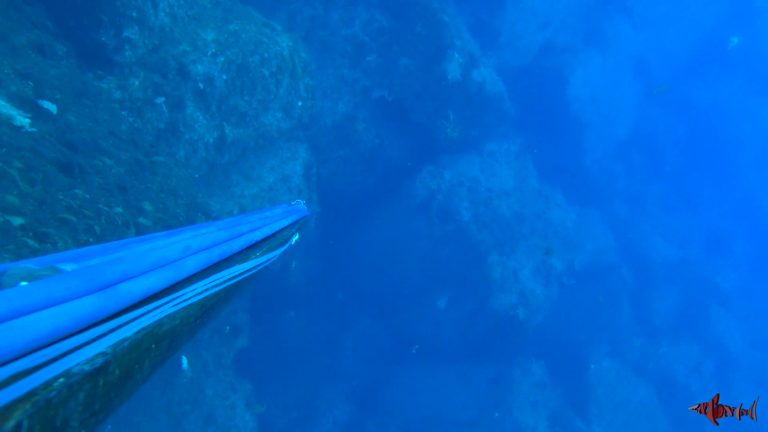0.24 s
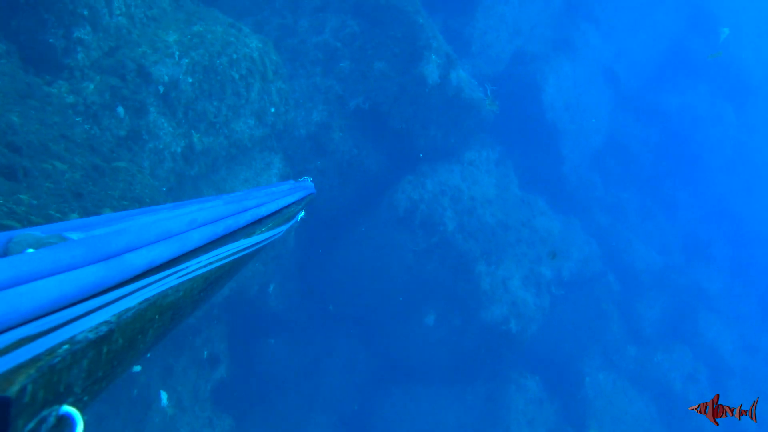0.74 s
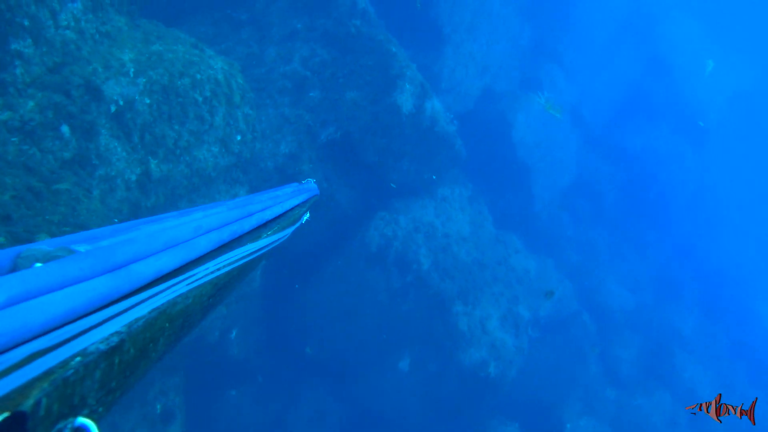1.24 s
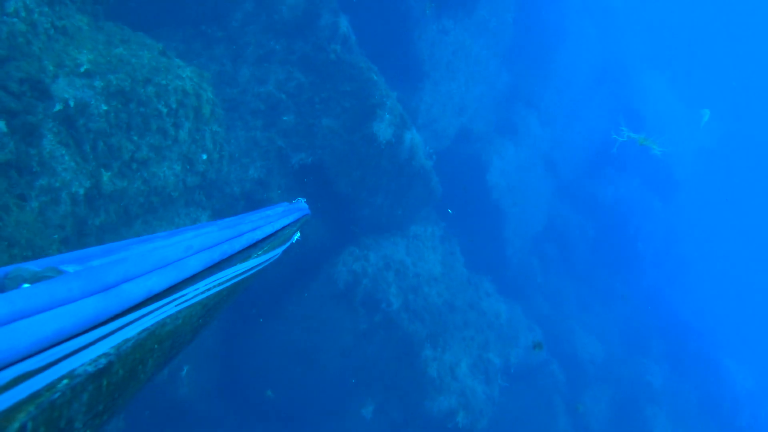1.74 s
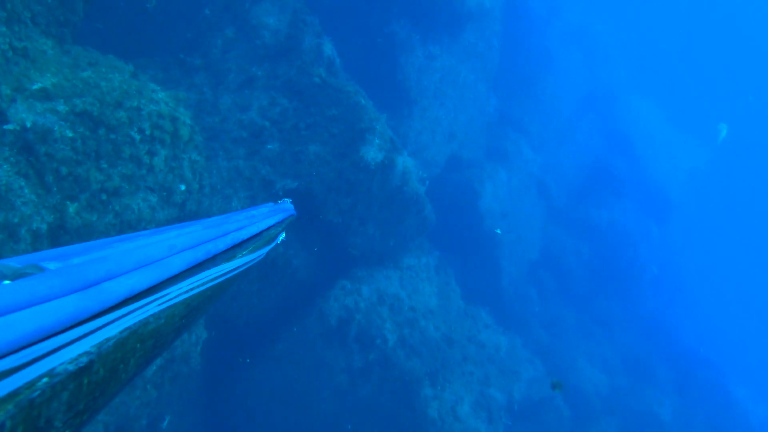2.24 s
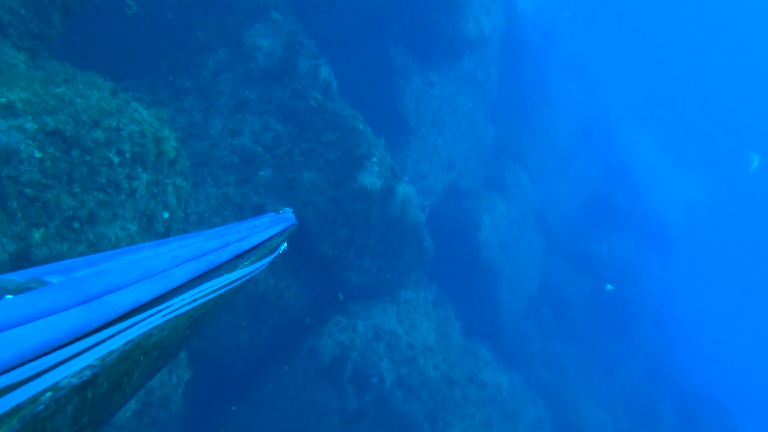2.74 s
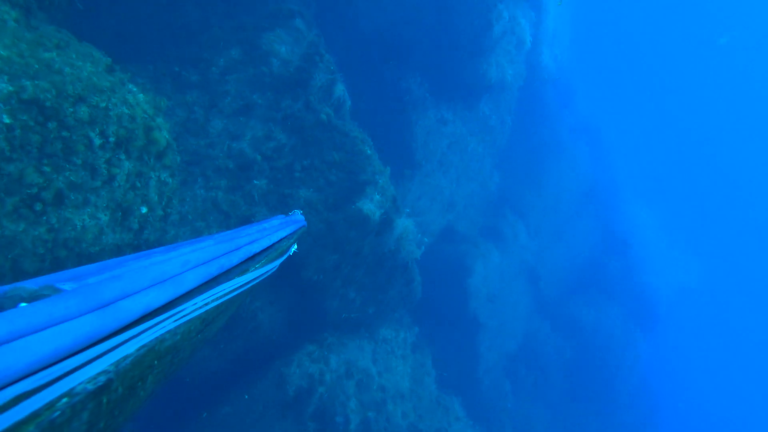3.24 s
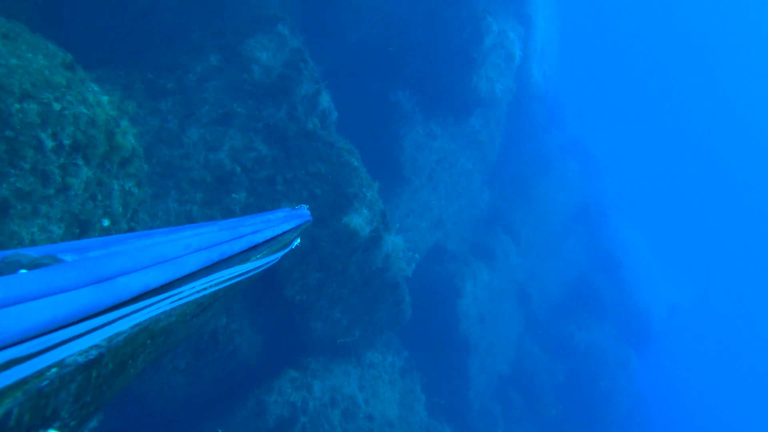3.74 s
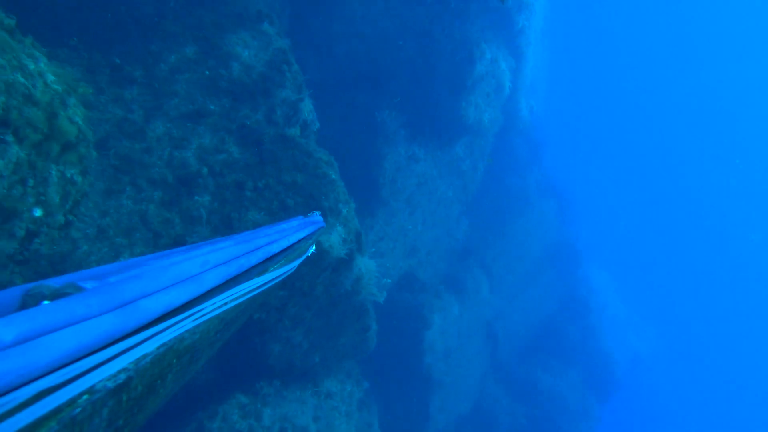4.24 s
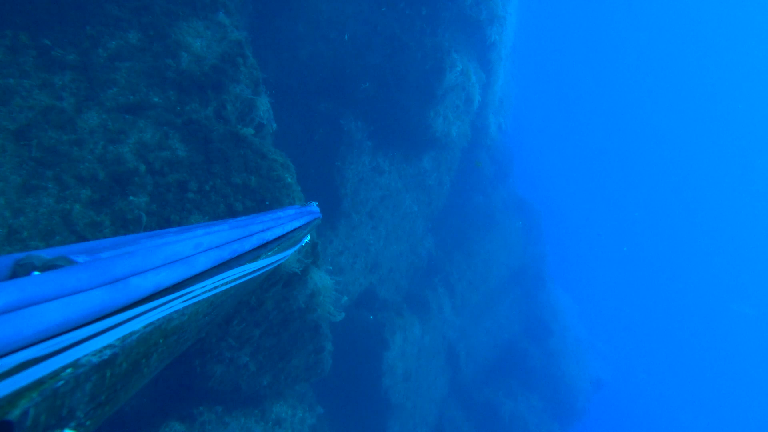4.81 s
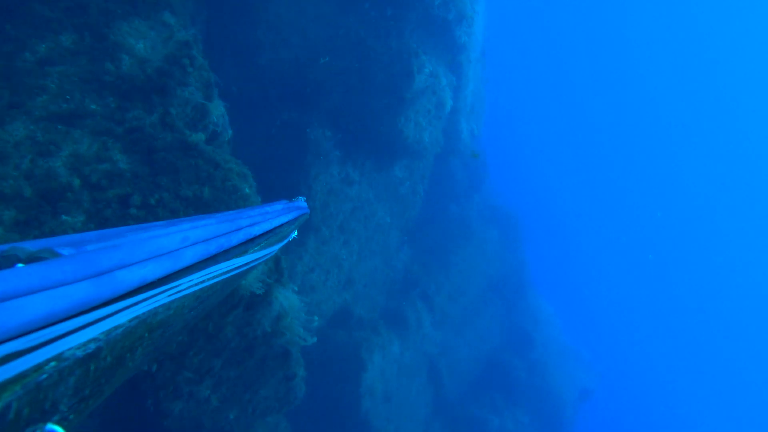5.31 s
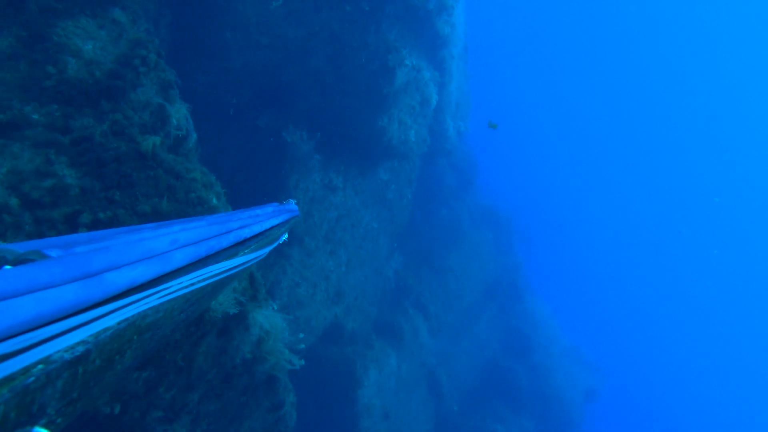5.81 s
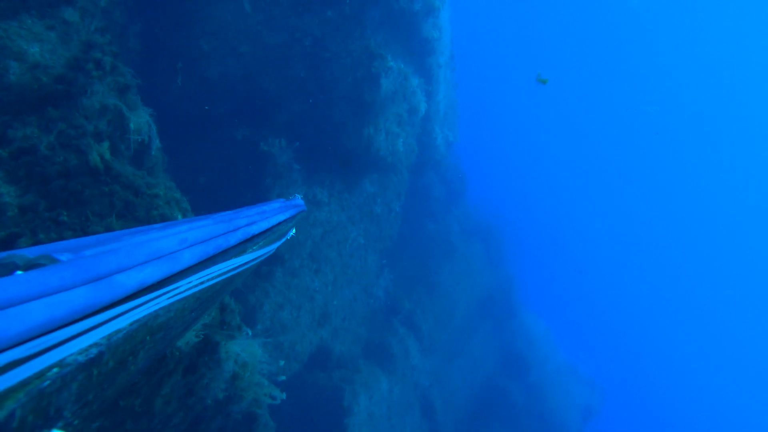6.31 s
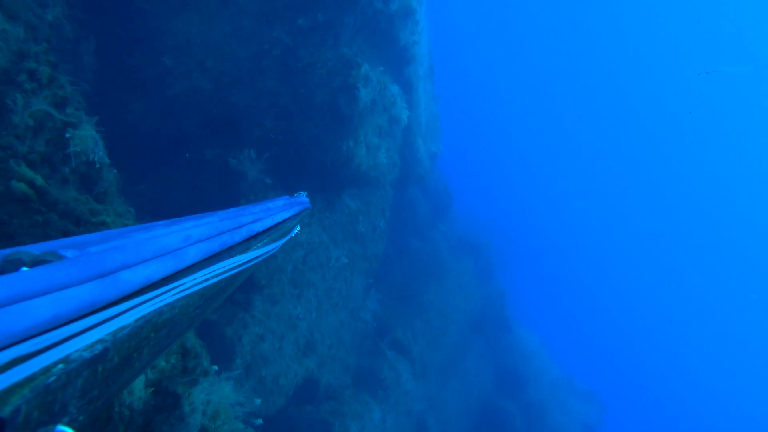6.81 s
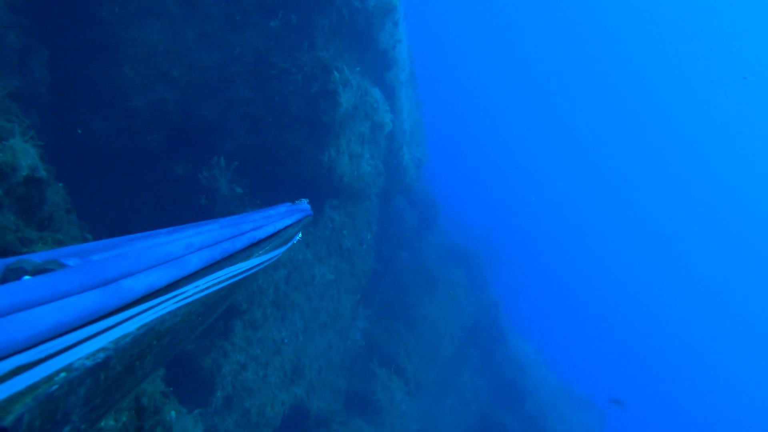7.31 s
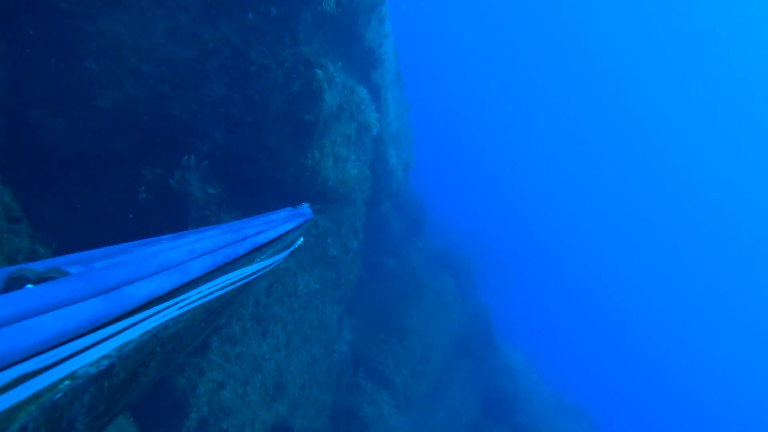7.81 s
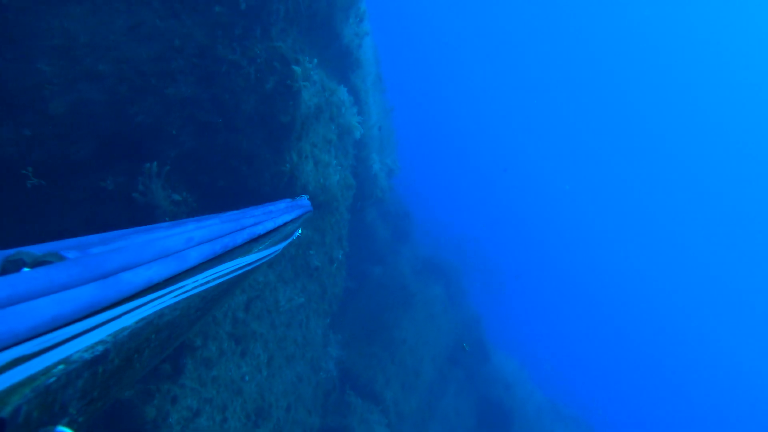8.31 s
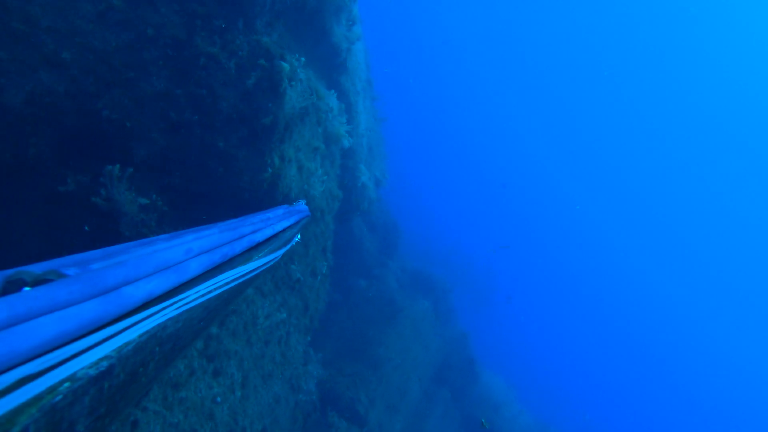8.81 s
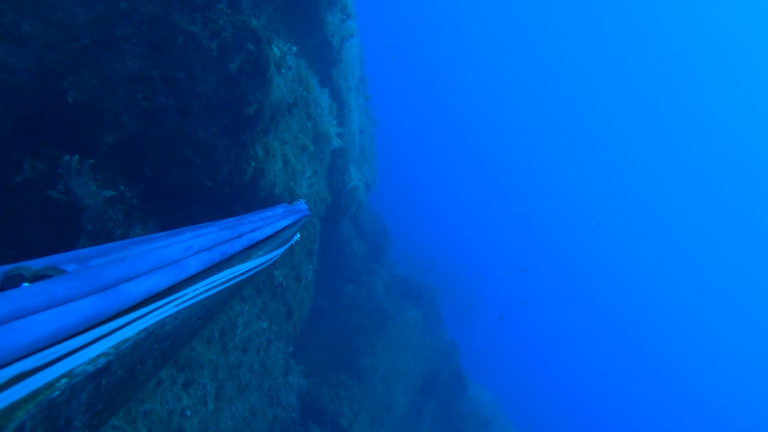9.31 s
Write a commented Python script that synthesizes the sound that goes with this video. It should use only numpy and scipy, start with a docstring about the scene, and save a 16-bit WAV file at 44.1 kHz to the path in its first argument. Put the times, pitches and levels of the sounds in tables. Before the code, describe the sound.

Underwater, tiny shrimp clicks crackle densely over a low rumble, with light hollow knocks and small bubble pops.

```python
"""A camera in a hard waterproof housing drifts along a rocky reef. From the start, shrimp near and far
snap by cavitation over the rumble of moving water; each impulse rings the housing, whose low modes
rock its two microphones in opposite directions. Within a second, grit, bubbles and gear begin to knock
and rustle on the shell, and small air pockets pop. From about halfway a light patter joins in and
the loudest snaps fall; a last deep surge at 8.5 s gives way to a run of pops."""
import sys
import numpy as np
from scipy import signal
from scipy.fft import rfft, irfft, next_fast_len
from scipy.io import wavfile
from scipy.ndimage import uniform_filter1d

SR = 44100
rng = np.random.default_rng(int(sys.argv[2]) if len(sys.argv) > 2 else 0)


def file_out(sig):
    """Save sig as 16-bit WAV at sys.argv[1]."""
    # one column per channel
    cols = np.atleast_2d(sig).T
    # limit, then scale
    lim = np.clip(cols, -1, 1)
    pcm = np.round(lim * 32767).astype(np.int16)
    wavfile.write(sys.argv[1], SR, pcm)


N = 421155

# Near snaps. Each row: start in seconds, peak in dB, centre in Hz, treble in dB relative to the peak.
SNAPS = [(0.1599, -33.5, 5080.0, -11), (0.4564, -48, 5790.0, 5), (0.6171, -41, 4210.0, 0),
         (0.6284, -32, 5740, -9), (0.716, -40.5, 6000, -8), (0.7863, -31, 3620, -12),
         (0.897, -33, 3900, -2), (0.9315, -35, 4030.0, -23.5), (0.9612, -37.5, 5400.0, -5),
         (1.1759, -38.5, 4470.0, -14.0), (1.1978, -34.5, 5100, -14), (1.214, -45, 6000, -2),
         (1.3077, -37, 5680.0, -18.0), (1.4641, -39, 4430.0, -14), (1.5601, -36.5, 4320.0, -7),
         (1.6012, -33.5, 3100, -18.5), (1.6355, -43, 5530.0, 1), (1.7509, -35, 2850, -3.5),
         (1.9244, -39, 4530.0, -10.5), (1.9721, -35, 4440.0, -23), (2.1897, -38, 5300.0, -20),
         (2.3324, -25, 5500.0, -4), (2.408, -43, 6000, 6.5), (2.5183, -45, 5100, -13),
         (2.53, -45, 2800, -20), (2.545, -33, 2700, -25), (2.6298, -40, 7070.0, -2),
         (2.7274, -30.5, 4640, -3), (2.7366, -41, 6350.0, -7), (2.8145, -46, 5810.0, -17.5),
         (2.9, -30.5, 3400, -14), (3.015, -39, 6000, 0), (3.061, -47.5, 6000, 5),
         (3.2075, -34.5, 4400, -16), (3.2489, -39, 5710.0, 0), (3.5498, -39.5, 7010.0, 0),
         (3.5742, -30.5, 6580.0, 1), (3.634, -35.5, 3000, -15), (3.667, -35.5, 6000, -9),
         (3.7846, -39, 4730, -14), (3.8563, -54, 5640.0, -9.5), (4.142, -40, 2700, -14),
         (4.240, -46.5, 6000, 5), (4.2824, -37, 6280.0, -16.0), (4.413, -37.5, 5500.0, -15.5),
         (4.5518, -23.5, 6000, -8), (4.562, -46, 5090.0, -14.0), (4.6376, -37, 5700.0, -21.0),
         (4.9113, -39.5, 5770.0, -2), (5.114, -50, 6000, 7), (5.1679, -45, 6000.0, -16.0),
         (5.1883, -36, 5630.0, -3), (5.5506, -27.5, 5800, -3.5), (5.590, -40, 7000, 0),
         (5.5931, -21, 4300, -18), (5.6019, -35, 3300.0, -12), (5.6622, -40, 6530.0, -15),
         (5.752, -39, 5000, -3), (5.8284, -30.5, 2700.0, -10), (5.8491, -35.5, 5240.0, -2),
         (5.8839, -51, 3630.0, -13.5), (5.9379, -33, 5140, 1), (6.0463, -33, 2830, -6),
         (6.1358, -36, 4440, -13), (6.2351, -42, 4870.0, -16.0), (6.267, -44, 5600, -8),
         (6.2957, -32, 2860, -13), (6.3187, -36.5, 3300.0, -17.0), (6.3477, -31.5, 4640.0, -2),
         (6.5222, -36.5, 4560.0, -3), (6.5523, -23, 6430, -7.5), (6.5602, -41, 5080.0, 2),
         (6.62, -59, 6000, -4), (6.6458, -42, 2860.0, -19.5), (6.68, -36.5, 6200, -1),
         (6.8515, -39, 3360.0, -9), (6.9097, -33.5, 4360.0, -16.0), (6.9469, -36, 5720.0, -8.0),
         (6.9891, -38, 5490.0, -15.0), (7.073, -27.5, 5350, -13), (7.0835, -33.5, 4600.0, -4),
         (7.4289, -29.5, 5450, -9), (7.440, -50, 6000, 0), (7.6108, -34, 2430.0, -23),
         (7.6883, -37, 5540.0, -14.0), (7.773, -22, 7200, -4), (7.7805, -36, 2950.0, -13.5),
         (7.874, -38, 6000, -1), (7.8936, -36, 5210.0, -18.0), (7.9026, -39, 3410.0, -6),
         (7.927, -36, 4750.0, 0), (7.9644, -26, 5230, -17), (7.9734, -31, 3430, -14.0),
         (8.0248, -37, 3020.0, -19.5), (8.1429, -53, 3600.0, -17.0), (8.1541, -44, 4570.0, -16.5),
         (8.1606, -35.5, 4470.0, -18), (8.2013, -35.5, 5620.0, -10.0), (8.2245, -35, 3220, -17),
         (8.3849, -29, 3370, -10), (8.5678, -35.5, 3200, 0), (8.6638, -38, 5190.0, -13),
         (8.7839, -33, 3540.0, -4), (8.834, -41, 5340.0, -11), (8.8851, -32, 4200.0, -21),
         (8.9916, -36.5, 2840, -17.0), (9.1044, -38, 4280, -17), (9.2075, -35, 5550.0, -8),
         (9.2317, -33, 4930.0, -8), (9.2512, -34, 3340, -17), (9.355, -45, 2920, -13.5),
         (9.4246, -38, 3860.0, -6), (9.482, -43, 5930, 2), (9.5176, -38, 2570, -9)]
# Two rows bound the fainter snaps, with the same columns after the start.
FAINT_SNAPS = [(-53, 5000, -22), (-48.5, 6300, 0)]

def snaps(octaves=0.55, rattle_t60=0.0082, rock_t60=0.19, treble_hz=10500):
    """Cavitation: a collapsing bubble gives a sharp blow, a quick rattle, then echoes from the rocks."""
    s, peak_db, hz, bright_db = with_faint(SNAPS, FAINT_SNAPS, count=20)
    draws = rng.random((len(s), 36))
    uneven_db = 2.5 * rng.standard_normal((len(s), len(MODES)))
    treble = MODE_HZ > 8000
    body_db = to_peak(peak_db, colour_db(hz, octaves) + uneven_db - 100 * treble)
    top_db = to_peak(peak_db + bright_db, colour_db(treble_hz, 0.15) + uneven_db - 100 * ~treble)
    rattle_s = 0.0029 * draws[:, :6] * (np.arange(6) > 0)
    echo_s = 0.027 * draws[:, 6:]
    fade_db = np.hstack([-2.5 - 60 * rattle_s / rattle_t60, -18 - 60 * echo_s / rock_t60])
    return burst(s, np.maximum(body_db, top_db), np.hstack([rattle_s, echo_s]), fade_db)

# Knocks on the shell. Each row: time in seconds, peak in dB, centre in Hz, then the relative levels
# in dB of the low thud, the hollow ring and the bright edge.
KNOCKS = [(0.7868, -26.5, 1000, -20, 2, -6), (0.8022, -36, 780.0, -14, -16, -13.5),
          (0.8952, -27.5, 1050, -5.5, -2, -4), (0.9061, -41, 1160.0, -11, -8, -3.5),
          (0.9303, -28, 1050, -8, -10, -4), (0.9399, -33, 1160.0, -25, -18.0, 2),
          (1.016, -42, 1100, -19, 1, -10), (1.1545, -36, 990, 3, -11, -11), (1.2292, -31, 1030, -7, -14, 3),
          (1.2395, -33, 780.0, -22, -17, -12), (1.2769, -42, 1040.0, -17, -16.0, -14.0),
          (1.2946, -30.5, 1040.0, -4, -6, 6), (1.3215, -31, 1040.0, -16, -6, -1),
          (1.4338, -29.5, 1030, -3, -5, -1), (1.7515, -34.0, 1040.0, 1, -13, -13),
          (1.9255, -30.5, 1160, -21, -3, -12), (1.9389, -38, 1040.0, -4.5, -13, -17.0),
          (2.2038, -34, 1160.0, -19.0, -9, -6), (2.3048, -28.5, 910, -19, -1.5, -2),
          (2.3341, -22, 910, -3.5, 1.5, 14), (2.4934, -20.5, 774, -15, -13, -16),
          (2.5039, -32.5, 1040.0, -6, -13.0, -12), (2.5277, -38, 780.0, 0, -15.0, -7.0),
          (2.5426, -35, 780.0, -14, -15, -6.0), (2.559, -22, 830, -20, -4, -22),
          (3.8513, -55, 1300.0, -17.5, 2, -13.0), (3.981, -29.5, 900.0, -10, 1, -14),
          (3.9885, -28, 1040, -5.5, -13, -4), (4.006, -39, 1100, -4, -2, -8),
          (4.0234, -31.5, 910, -10, -7, 5), (4.051, -37, 1160, -14, -8, -12),
          (4.0959, -30, 900.0, -2, -10, -3), (4.101, -31.5, 1100, -6, -6, -6),
          (4.111, -42, 1160, -13, -8, 2), (4.1224, -36, 1040.0, -17.0, -16.5, 5),
          (4.8425, -34, 1300.0, -29.0, -13, -16.0), (4.8977, -40, 1300.0, -21.5, -11.5, -18.5),
          (5.0695, -34.5, 1050, -18, -1, -2), (5.0968, -36, 1040.0, -7, 4, -8),
          (5.2895, -41, 1160.0, -1, -14.0, -10.5), (5.360, -37, 780, -14, -18, -20),
          (5.3713, -27.5, 885, -18, -7, -15), (5.393, -41, 1160, -4, -4, -6),
          (5.5527, -33.5, 1040.0, -1.5, -11, -3), (5.5934, -40, 1300, -10, 2, 13),
          (6.048, -36, 1300.0, -3, -11, -3), (6.0695, -51, 1160.0, -12.5, -17.5, -15.5),
          (6.0756, -37.5, 1040.0, -10, -14, -22.0), (6.0809, -28, 1000, -10, -18, -24),
          (6.0831, -27, 930, -7, -25, -22), (6.1033, -51, 1300.0, -22.5, -5, -14.0),
          (6.6391, -35.0, 1300.0, -15, -14, -4), (6.7156, -34, 900.0, 0, -14, -15.5),
          (6.9201, -32.5, 1300.0, -15, -13, -14), (7.0573, -29, 1200, -8, -7, -17),
          (7.0706, -32, 1160.0, -19.0, -6, -21.5), (7.413, -34, 1160.0, -6, -4, 6),
          (7.6114, -33, 1300, -4, 1, -7), (7.7813, -30, 1160.0, -14, -1.5, -7),
          (8.0499, -34, 1160.0, -6, -21.5, -8), (8.2271, -34, 1300.0, -12, -6, -7),
          (8.3012, -34, 784, -12, -14, -16), (8.3219, -32.5, 1040.0, -20, -12, -14),
          (8.3851, -30, 900.0, -26.0, -20, -5.0), (8.5686, -35, 1160.0, -7, -2, -10),
          (8.7842, -30.5, 1160.0, -13, -11, -4), (8.7989, -38, 1300.0, -17, -3, -12.5),
          (8.9923, -37, 1160.0, -2, -3, -2), (9.1052, -38, 1160.0, -14, -14, -8.0),
          (9.2517, -35, 1160.0, -4, -6, -1), (9.5185, -33, 1150, -2, -5, -6)]
# Two rows bound the fainter knocks, with the same columns after the time.
FAINT_KNOCKS = [(-47.5, 990, -9, -16, -14), (-34.5, 1240, -4, 3, -9)]

def knocks(octaves=0.27, early_s=0.00036, rattle_s=0.00804, rattle_t60=0.067):
    """Impact excitation: a contact and its weaker rattle drive each band of modes by its own amount."""
    s, peak_db, hz, *bands_db = with_faint(KNOCKS, FAINT_KNOCKS, count=30)
    thud_db, hollow_db, edge_db = np.array(bands_db)[:, :, None]
    heard_db = np.select(
        [MODE_HZ < limit_hz for limit_hz in (300, 520, 1350, 1850, 2400)],
        [thud_db - 12, thud_db, np.maximum(colour_db(hz, octaves), -10),
         hollow_db - 14 * (WIDTH_HZ < 200), edge_db],
        default=edge_db - 11 * (1 + np.log2(MODE_HZ / 2400)))
    uneven_db = 1.26 * rng.standard_normal(heard_db.shape)
    force_db = to_peak(peak_db, heard_db - GAIN_DB - 20 * np.log10(WIDTH_HZ) + uneven_db)
    delay_s = rattle_s * rng.random((len(s), 5)) * (np.arange(5) > 0)
    return burst(s - early_s, force_db, delay_s, -10 * (delay_s > 0) - 60 * delay_s / rattle_t60)

# Housing modes. Each row: frequency in Hz, width in Hz, gain in dB, left minus right in dB,
# phase lead of the left in radians, likeness at the two microphones from 0 to 1.
MODES = [(160.5, 31, 7.5, -4.5, -0.2, 0), (233.5, 85, 5, 0, 2, 0), (372, 130, 3, -1, 2.5, 0.84),
         (577, 660, -6.5, 1, 3, 0.74), (791, 280, -1, 3, 3.5, 0.85), (1050, 177, -1.5, -0.5, 3.5, 0.94),
         (1174, 323, 0.5, -1, 3.5, 0.88), (1445, 155, -6, -4, 1, 0.77), (1637, 343, -7, -0.5, 2, 0.79),
         (2010, 660, -5, 0, 3.5, 0.9), (2677, 1010, -15.5, -3, 1.6, 0.72), (3385, 465, -14.5, 1, 2, 0.9),
         (3880, 940, -20.5, -5, 3, 0.65), (4430, 850, -18, 4, 3.5, 0.89), (5164, 980, -12, -4, 2, 0.98),
         (6080, 600, -15, -2.5, 2.0, 1), (6870, 1750, -20, -1.5, 2.5, 0.08),
         (9780, 6200, -27, 4, -0.5, 0.45), (11630, 2430, -23, 1, 0.76, 0.64),
         (13500, 5900, -29.5, -3.5, -0.5, 0.6)]
MODE_HZ, WIDTH_HZ, GAIN_DB, PAN_DB, LEAD_RAD, _ = np.transpose(MODES)

def housing(blows):
    """Modal resonance: the blows and the hiss of the farthest shrimp ring each mode of the shell."""
    s, force_db = map(np.concatenate, zip(*blows))
    at = np.clip(np.round(s * SR).astype(int), 0, N - 1)
    shared, *own = rng.standard_normal((len(s), len(MODES), 3)).T
    hiss = rng.standard_normal((3, N)) * amp(18 + curve(COLONY, np.arange(N) / SR))
    hiss_share = amp(colour_db(hz=10000, octaves=2.18)[0])
    out = np.zeros((2, N))
    for k, (hz, width, gain_db, pan_db, lead, likeness) in enumerate(MODES):
        radius = np.exp(-np.pi * width / SR)
        # a double pole: soft start and steep flanks
        poles = np.poly([radius * np.exp(2j * np.pi * hz / SR)] * 2)
        feedback = np.convolve(poles, poles.conj()).real
        alike, apart = np.sqrt([likeness, 1 - likeness])
        for mic, side in enumerate([.5, -.5]):
            impulses = amp(force_db[:, k]) * (alike * np.sign(shared[k]) + apart * own[mic][k])
            drive = np.bincount(at, impulses, N) + hiss_share[k] * (alike * hiss[2] + apart * hiss[mic])
            gain = 2 * (1 - radius) ** 2 * amp(gain_db + side * pan_db)
            forward = gain * (np.exp(1j * side * lead) * poles.conj()).real
            out[mic] += signal.lfilter(forward, feedback, drive)
    return out

# Air pockets. Each row: time in seconds, level in dB, pitch in Hz.
POPS = [(0.828, -43, 1150), (0.954, -36, 1210), (0.999, -31, 1150), (1.089, -30, 1100), (1.649, -39, 1167),
        (1.712, -35, 1160), (1.951, -41, 870), (2.397, -35, 750), (2.493, -25, 780), (2.526, -28, 790),
        (2.536, -29, 890), (2.617, -39, 830), (2.650, -37, 900), (2.701, -33, 1170), (2.846, -50.5, 1450),
        (3.408, -40, 1180), (3.591, -38.5, 790), (3.683, -37, 860), (3.851, -49, 1460), (4.845, -44, 1415),
        (5.024, -44.5, 1480), (5.228, -46, 1410), (5.300, -58, 1520), (5.313, -55, 1460),
        (5.329, -57, 1460), (5.908, -37, 1230), (6.006, -36, 810), (6.112, -41, 1190), (6.122, -42, 1170),
        (6.17, -35, 855), (6.2, -32.5, 834), (6.241, -34, 810), (6.531, -49, 1460), (6.638, -40, 1460),
        (6.684, -44, 1480), (6.766, -51, 1480), (6.792, -47, 1440), (6.855, -44.5, 1460),
        (6.965, -41.5, 1470), (7.013, -43, 1440), (7.110, -44, 1460), (7.247, -45, 1470),
        (7.355, -48, 1450), (7.382, -48, 1450), (7.441, -44, 1470), (7.538, -45, 1430), (7.563, -40, 1490),
        (7.657, -44, 1476), (7.837, -39, 790), (7.922, -39, 760), (8.127, -35, 800), (8.143, -42.5, 1410),
        (8.715, -39.5, 1430), (8.749, -38, 1260), (8.819, -33, 800), (8.962, -32.5, 830), (9.049, -32, 800),
        (9.07, -51, 795), (9.098, -47, 804), (9.122, -31, 830), (9.18, -51, 825), (9.285, -30.5, 810)]

def pops(rise_s=0.004, t60=0.024, early_s=0.001296, glide=0.04, gurgle_s=0.0088, detune=0.17):
    """Bubble resonance: each air pocket rings a soft, slightly rising note amid two weaker ones."""
    # fainter pops are drawn as a level in dB and a ratio to one of two pocket pitches
    starts, levels_db, pitches = with_faint(POPS, [(-46, 0.87), (-43, 1.02)], count=20)
    pitches[len(POPS):] *= rng.choice([807, 1196], len(starts) - len(POPS))
    out, t = np.zeros((2, N + 4000)), np.arange(2000) / SR
    attack = np.sin(np.pi / 2 * np.minimum(t / rise_s, 1)) ** 2
    envelope = attack * amp(-60 * np.maximum(t - rise_s, 0) / t60)
    climb = t * (1 + glide * (t - 2 * rise_s) / t60)
    side = np.array([[.5], [-.5]])
    for s, db, hz in zip(starts, levels_db, pitches):
        # phase and balance follow the nearest housing modes
        lead, pan_db = side * np.interp(hz, MODE_HZ, LEAD_RAD), side * np.interp(hz, MODE_HZ, PAN_DB)
        for weak, (turn, shift, bend) in zip([0, 1, 1], rng.random((3, 3))):
            at = max(round((s - early_s + weak * gurgle_s * (2 * shift - .5)) * SR), 0)
            note_hz = hz * (1 + weak * detune * (2 * bend - 1))
            note = envelope * np.cos(2 * np.pi * (turn + note_hz * climb) + lead)
            out[:, at:at + len(t)] += note * amp(db - 9 * weak + pan_db)
    return out[:, :N]

# Rustles. Each row: start in seconds, length in seconds, base force in dB, centre in Hz.
RUSTLES = [(0.875, 0.15, -42, 900), (1.171, 0.15, -26, 1600), (1.186, 0.1, -23.5, 5200),
           (1.874, 0.14, -24, 1200), (2.492, 0.078, -21, 1800), (2.509, 0.078, -25, 4800),
           (2.551, 0.21, -34, 1100), (3.97, 0.26, -26, 900), (5.238, 0.17, -27.5, 745),
           (6.05, 0.047, -39, 960), (6.503, 0.07, -28, 3050), (8.234, 0.21, -21.5, 1520)]

def rustles(octaves=1.66, dull_hz=6400, count=300):
    """Superposition: tiny contacts crowd together and thin out in a rush that is dull at the top."""
    start, length, db, hz = np.repeat(np.transpose(RUSTLES), count, axis=1)
    first, second, size = rng.random((len(start), 3)).T
    size_db = db - 2 * np.log(size + .05)
    force_db = colour_db(hz, octaves) - 10 * (MODE_HZ > dull_hz) + size_db[:, None]
    return start + length * (first + second) / 2, force_db

# The far shrimp colony. Each row: time in seconds, relative level in dB.
COLONY = [(0.0, -62), (1.09, -60.5), (2.28, -61), (3.62, -60), (3.99, -61.5), (5.77, -60.5), (6.33, -61),
          (7.87, -58), (8.59, -61.5), (9.04, -59), (9.55, -61)]

def colony():
    """Incoherent summation: thousands of distant snaps crackle and merge into fizz."""
    flurry = flurries(depth_db=2.5, per_s=6)
    crackle = scatter(COLONY, flurry, (1970, 14600), gain_db=40.4, octaves=0.32, spread_db=2.25,
                      count=2200, uneven_db=4)
    fizz = scatter(COLONY, flurry, (1800, 6700), gain_db=38.43, octaves=1, spread_db=0.56,
                   count=12000, contacts=1)
    return crackle, fizz

# Rubbing and trickling along the shell. Each row: time in seconds, relative level in dB.
RUBBING = [(0.0, -63.5), (0.74, -65.5), (1.22, -59), (1.7, -64), (2.07, -58), (2.28, -63), (2.63, -59),
           (2.93, -63.5), (4.2, -65), (4.84, -61.5), (7.18, -60.5), (7.39, -61), (7.74, -63), (8.24, -59.5),
           (8.54, -64), (9.55, -63)]

def rubbing():
    """Friction: sliding contact breaks up into small ticks and fine grit."""
    flurry = flurries(depth_db=2.5, per_s=6)
    ticks = scatter(RUBBING, flurry, (700, 2240), gain_db=41, octaves=0.26, spread_db=1.96,
                    count=1200, uneven_db=1)
    grit = scatter(RUBBING, flurry, (250, 2740), gain_db=39.37, octaves=0.76, spread_db=2.28,
                   count=9000, contacts=1)
    return ticks, grit

# A light patter. Each row: time in seconds, base force in dB.
PATTER = [(0, -30), (4.5, -38), (4.72, -17), (5.3, -25), (5.6, -36), (6.2, -17), (6.6, -12.5), (7.6, -16),
          (7.8, -25), (9.55, -16.5)]

def patter():
    """Selective excitation: taps on one spot of the shell drive a narrow band of modes."""
    flurry = flurries(depth_db=1.5, per_s=7.7)
    return scatter(PATTER, flurry, (1270, 1720), gain_db=0, octaves=0.16, spread_db=1.7, count=900)

# The deep surge and the upper rumble. Each row: time in seconds, in-phase level in dB.
SURGE = [(0.0, -38.5), (0.211, -34), (0.4, -51), (0.65, -42.5), (1.17, -40.5), (1.41, -31.5), (1.7, -45.5),
         (2.77, -39), (3.48, -45.5), (4.44, -41), (4.79, -42), (5.53, -45.5), (5.83, -41.5), (6.9, -43.5),
         (8.33, -47.5), (8.46, -33.5), (8.75, -48), (9.55, -47)]
WASH = [(0, -48), (1.3, -47), (2.8, -47.5), (3.4, -51), (4.8, -51), (5.2, -48.5), (7, -49), (8.5, -50),
        (9.55, -52)]
# Rumble in phase and in antiphase at the microphones. Each row: frequency in Hz, relative density in dB.
IN_PHASE = [(4, -30), (12, -0.5), (17, 5.5), (21, 13.5), (26, 6.5), (32, 6.5), (38, 7), (46, -2.5),
            (113, -16), (164, -15.5), (204, -25), (330, -34), (430, -51), (730, -120)]
ANTIPHASE = [(2.4, -40), (4.0, -23), (16, 13), (54, 2.5), (70, -5), (92, -9), (117, -11.5), (161, -8),
             (197, -17), (228, -9.5), (285, -42), (330, -43), (430, -62), (730, -120)]

def rumble(split_hz=55, steady_s=0.29):
    """Flow noise: water pushes and rocks the housing in two low bands that swell independently."""
    size = next_fast_len(N)
    hz, t = np.fft.rfftfreq(size, 1 / SR), np.arange(N) / SR
    density_db = [np.interp(np.log(hz + 1), np.log(points_hz + 1), db)
                  for points_hz, db in map(np.transpose, [IN_PHASE, ANTIPHASE])]
    spectra = rfft(rng.standard_normal((2, size))) * amp(density_db) * amp([[0], [-10.5]])
    deep = 1 / (1 + (hz / split_hz) ** 8)
    out = np.zeros((2, N))
    for levels, band, right_db, opposed_db in [(SURGE, deep, .3, .1), (WASH, 1 - deep, 2.6, 1.5)]:
        common, opposed = irfft(spectra * band, size)[:, :N] * amp([[0], [opposed_db]])
        # dividing by the running RMS removes the noise's own slow swings
        rms = np.sqrt(uniform_filter1d(common ** 2, round(steady_s * SR)) + 1e-20)
        gain = amp(curve(levels, t)) / rms * amp([[-right_db / 2], [right_db / 2]])
        out += gain * np.array([common + opposed, common - opposed])
    return out

def scatter(levels, flurry, centres_hz, gain_db, octaves, spread_db, count, contacts=3, uneven_db=0):
    """Shot noise: random blows, many small and a few large, each with its own colour."""
    draws = rng.random((count, 3 + contacts))
    s = draws[:, 0] * N / SR
    excess_db = spread_db * np.minimum(-np.log(draws[:, 1] + 1e-9), 3)
    size_db = gain_db + curve(levels, s) + curve(flurry, s) + excess_db
    low, high = centres_hz
    force_db = colour_db(low * (high / low) ** draws[:, 2], octaves) + size_db[:, None]
    force_db += uneven_db * rng.standard_normal(force_db.shape)
    delay_s = .004 * draws[:, 3:] * np.arange(contacts)
    return burst(s, force_db, delay_s, -1200 * delay_s)

def flurries(depth_db, per_s, count=30):
    """Random modulation: slow sines sum to a wavering level, in rows of seconds and dB."""
    s, draws = np.arange(0, N / SR + .01, .01), rng.random((count, 2))
    rates_hz = per_s * 2 ** (4 * draws[:, :1] - 2)
    waves = np.sin(2 * np.pi * (rates_hz * s + draws[:, 1:]))
    return np.c_[s, depth_db * np.sqrt(2 / count) * waves.sum(0)]

def with_faint(rows, limits, count):
    """Uniform sampling: adds events between two limits at random times, and returns columns."""
    low, high = np.array(limits, float)
    draws = rng.random((count, 1 + len(low)))
    faint = np.c_[draws[:, 0] * N / SR, low + (high - low) * draws[:, 1:]]
    return np.vstack([rows, faint]).T

def burst(s, force_db, delay_s, fade_db):
    """Delay and attenuation: repeats each blow, returning times and the force in dB on each mode."""
    return (s[:, None] + delay_s).ravel(), (force_db[:, None] + fade_db[..., None]).reshape(-1, len(MODES))

def colour_db(hz, octaves):
    """Excitation spectrum: a bell on the octave scale about hz, as blows by modes."""
    return -3 * (np.log2(MODE_HZ / np.reshape(hz, (-1, 1))) / octaves) ** 2

def to_peak(peak_db, shape_db):
    """Power summation: scales the force so that the modal peaks together reach peak_db."""
    peaks = amp(shape_db + GAIN_DB) * 2 * np.pi * WIDTH_HZ / SR / np.e
    return shape_db + (peak_db - 20 * np.log10(np.linalg.norm(peaks, axis=1)))[:, None]

def curve(rows, s):
    """Linear interpolation of a control at the times s."""
    return np.interp(s, *np.transpose(rows))

def amp(db):
    """Decibels to amplitude ratio."""
    return 10 ** (np.asarray(db) / 20)

def scene():
    """Superposition: the ringing housing and the pops add to the rumble."""
    blows = [snaps(), knocks(), rustles(), *colony(), *rubbing(), patter()]
    return housing(blows) + pops() + rumble()

def record(dry):
    """Band limiting: a steep low-pass filter removes the highest treble."""
    lowpass = signal.firwin(511, 15850, window=("kaiser", 9), fs=SR)
    return signal.oaconvolve(dry, lowpass[None], "same")

dry = scene()
out = record(dry)
file_out(out)
```